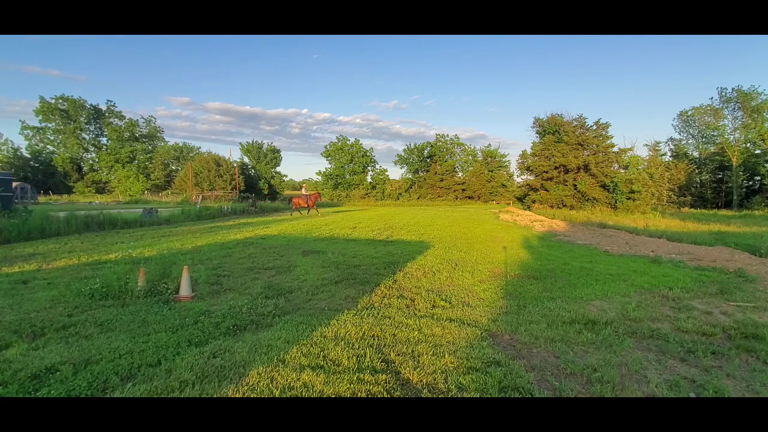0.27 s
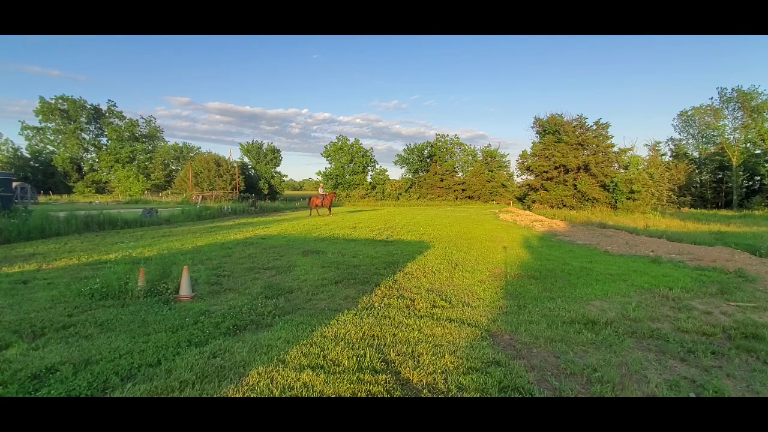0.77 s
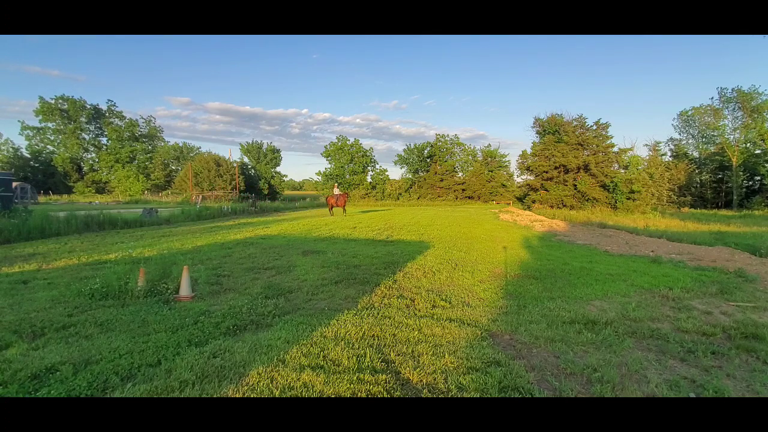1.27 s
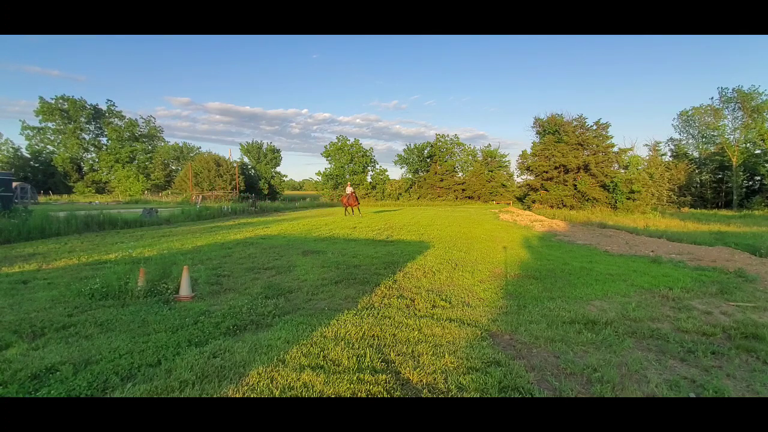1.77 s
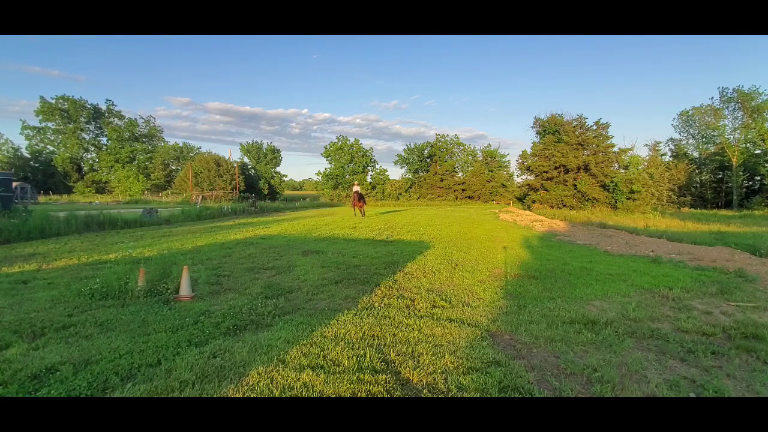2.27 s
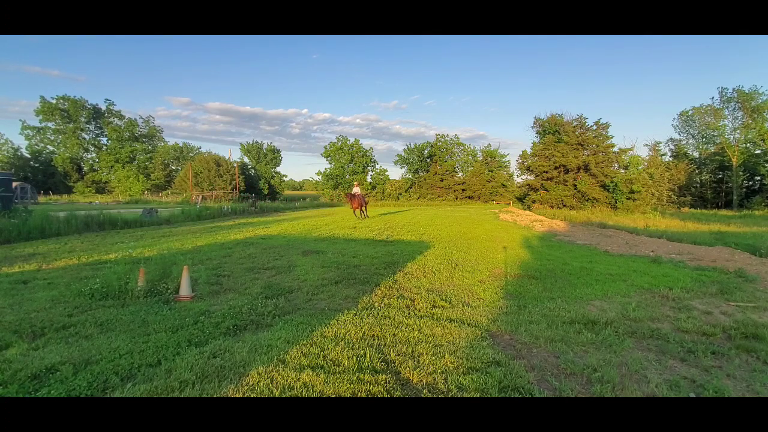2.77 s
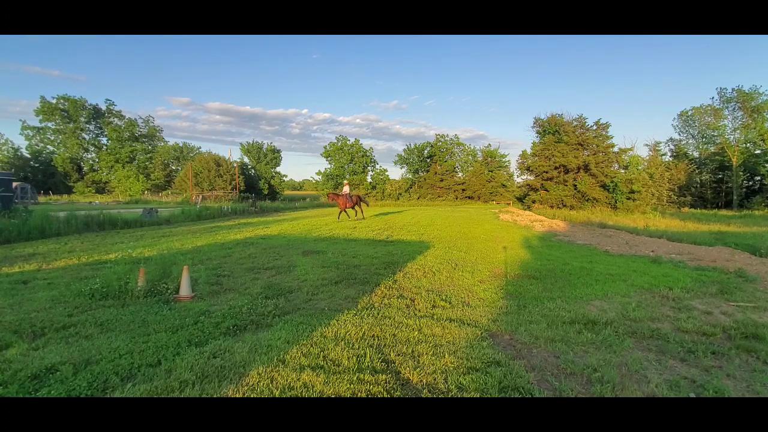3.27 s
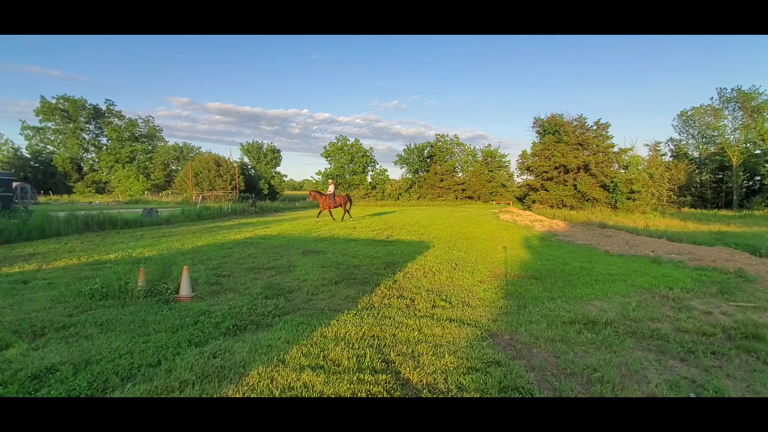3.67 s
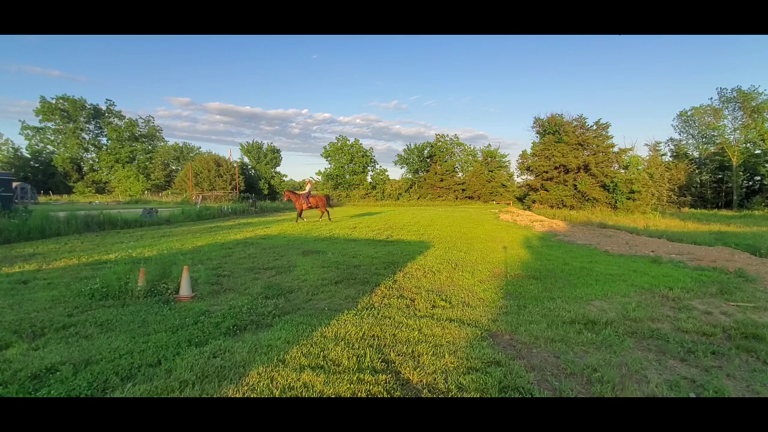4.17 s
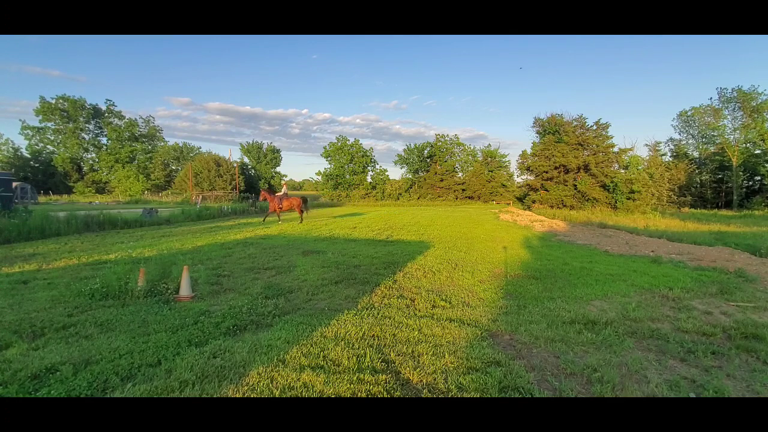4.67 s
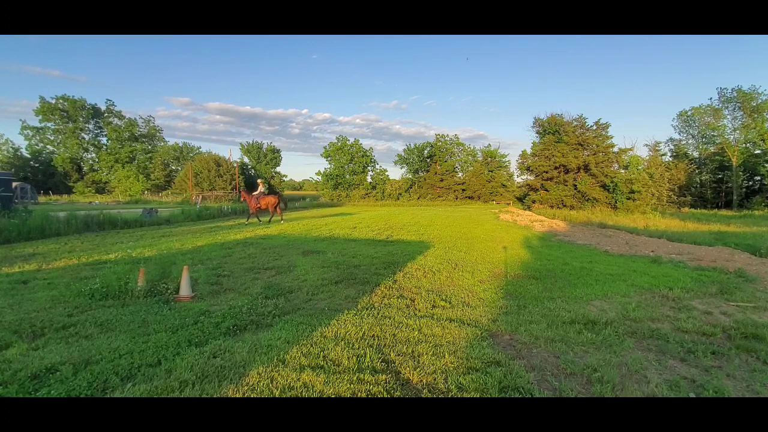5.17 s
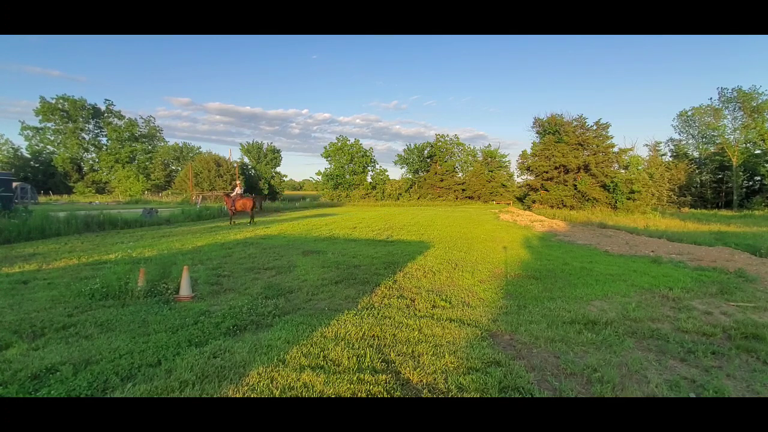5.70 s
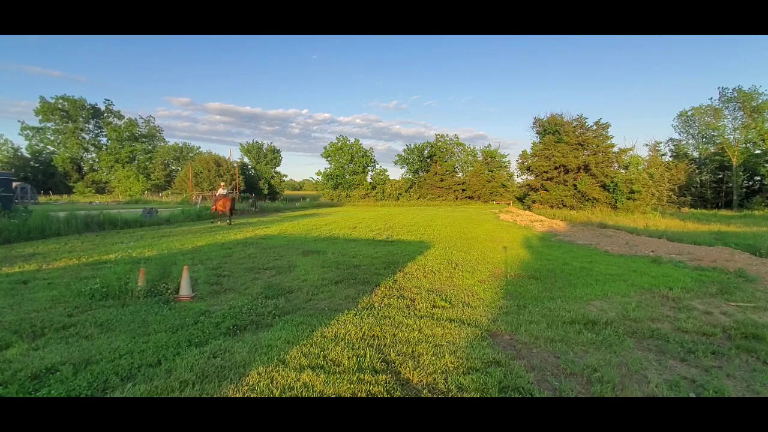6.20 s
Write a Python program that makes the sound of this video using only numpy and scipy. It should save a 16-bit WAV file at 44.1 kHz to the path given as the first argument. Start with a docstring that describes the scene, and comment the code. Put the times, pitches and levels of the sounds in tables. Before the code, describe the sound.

Crickets chirp throughout in an open field, mostly on the left: one close, high and raspy, others pulsing farther off over a steady insect chorus and a faint wash of air. From the start, a songbird on the left whistles one quick, clear phrase, with two falling notes around 1.5 seconds and a short trill ending at about 2.3 seconds. Low wind then builds on the microphone, mainly on the right. Its rumble and thumps are the loudest sound, from about 2.8 to 3.8 seconds. Lighter bumps follow, and a weaker gust reaches both sides from around 5.5 seconds. Faint birds call from distant trees just after the start and again between 3 and 5 seconds. Dry grass brushes and snaps quietly here and there, with soft, dull scuffs near 3.1, 4.6 and 5.8 seconds.

```python
"""Crickets chirp near and far and a songbird whistles one quick phrase, mostly on the left.
It is a summer evening in an open field: wings scrape over a steady insect chorus and a wash of air.
Dry grass brushes and snaps, birds call from the tree line and a few soft scuffs come and go.
Low gusts build and buffet the microphone, their eddies thumping mainly its right port."""
import sys
import numpy as np
from scipy import signal
from scipy.fft import rfft, irfft, next_fast_len
from scipy.io import wavfile
from scipy.ndimage import uniform_filter1d

SR = 44100
rng = np.random.default_rng(int(sys.argv[2]) if len(sys.argv) > 2 else 0)


def master_out(mix):
    """Clip the mix to full scale and print it as 16-bit PCM to the path in sys.argv[1]."""
    frames = np.transpose(np.atleast_2d(mix))
    ceiling = np.clip(frames, -1, 1)
    pcm = np.round(ceiling * 32767).astype(np.int16)
    wavfile.write(sys.argv[1], SR, pcm)


N = 284004
TIME = np.arange(N) / SR

# Tone of the distant air, then of the hiss on the right. Each row: frequency in Hz, relative level in dB.
AIR_COLOUR = [(60, -7), (200, -2.5), (450, 0), (1000, 0), (1450, 4), (2100, -3.5), (3000, -5.5), (5000, 3),
              (8000, -25.5), (15000, -46)]
HISS_COLOUR = [(100, 21), (500, 1.5), (1500, -7), (3500, -9), (6000, -18), (8500, -17), (13000, -10.5),
               (15500, -22)]
# Slow ride of the distant air. Each row: time in seconds, relative level in dB.
AIR_RIDE = [(0.0, -86.5), (0.86, -87.5), (1.15, -84.5), (1.97, -84.5), (2.37, -87), (3.39, -81.5),
            (5.07, -88.5), (5.76, -83.5), (6.06, -86), (6.44, -83)]
# Humming bands of the insect bed. Each row: centre in Hz, width in Hz, level in dB before the swell.
CHORUS_BANDS = [(5316, 676, -64), (4295, 820, -71.5), (6170, 840, -76.5), (3305, 1800, -80.5)]
# Swell of that bed. Each row: time in seconds, gain in dB.
CHORUS_SWELL = [(0, -0.5), (1, -1.5), (2, -1), (3, -2), (3.6, 0.5), (4.4, -3.5), (5.2, -2.5), (5.6, 0),
                (6.44, -2.5)]
# Resting stir of the grass. Each row: time in seconds, relative level in dB.
GRASS_STIR = [(0, -90), (1.15, -88), (1.8, -86.5), (2.45, -89.5), (3.1, -79), (4.1, -95), (4.35, -94),
              (5.3, -91.5), (6.44, -83)]
# Bands where dry blades brush. Each row: centre in Hz, width in Hz, gain in dB.
GRASS_BANDS = [(5400, 4000, -3.5), (9650, 1300, -10.5), (11420, 2040, -5.5), (13600, 1200, -4),
               (14900, 1200, -8.5)]
# Single swishes of grass. Each row: crest in seconds, 60 dB decay in seconds, relative level in dB.
SWISHES = [(.98, 0.72, -78), (1.995, 0.7, -77.5), (2.33, 0.23, -71), (2.72, 0.48, -72), (3.08, 0.3, -69.5),
           (3.17, .3, -73), (3.35, 0.89, -75), (3.59, 0.18, -72), (3.81, 1, -71.5), (4.03, 0.55, -73),
           (4.21, 0.28, -78), (4.6, 0.53, -73), (5.04, 0.5, -78), (5.21, 1.3, -78), (5.58, .3, -76.5),
           (5.73, .6, -75), (5.87, 0.63, -78), (5.99, 0.25, -76), (6.26, 0.24, -70.5)]
# Snapping stalks. Each row: start in seconds, relative level in dB.
SNAPS = [(0.814, -75), (0.9607, -68), (1.9574, -73), (1.993, -59.5), (2.331, -63), (2.683, -72),
         (3.3214, -62.5), (3.584, -66), (3.604, -66), (4.0365, -60.5), (4.36, -77), (4.699, -70),
         (5.189, -66), (5.5805, -63), (5.7073, -65), (5.848, -62.5), (5.8844, -70), (5.988, -70),
         (6.2652, -73)]
# Ring of a stalk. Each row: frequency in Hz, 60 dB decay in seconds, gain in dB.
STALK_MODES = [(6180, 0.012, 7.5), (9600, 0.003, 6.5), (11600, 0.065, 0), (13250, 0.068, 2)]
# Soft scuffs in the field. Each row: start, rise and 60 dB decay in seconds, level in dB.
SCUFFS = [(1.24, 0.1, 0.23, -77), (3.14, 0.047, 0.28, -62.5), (4.598, 0.034, 0.41, -61),
          (5.19, 0.033, 0.41, -74), (5.40, 0.035, 0.69, -70.5), (5.775, 0.036, 0.4, -58.5)]
# Their dull tone. Each row: frequency in Hz, relative level in dB.
SCUFF_COLOUR = [(150, -11), (400, -0.5), (620, -0.5), (850, 2), (1250, -4.5), (1800, -11), (3500, -28)]
# Bouts of the far crickets. Each row: middle of the first and of the last chirp in seconds,
# rough period in seconds, relative level in dB.
FAR_BOUTS = [(.008, 3.255, .203, -63), (3.49, 3.735, .245, -62), (4.04, 4.46, .21, -65),
             (4.67, 4.88, .21, -69), (5.47, 5.89, .21, -63.5), (6.14, 6.37, .23, -70)]
# Calls from the tree line, then the songbird's opening notes. Each row: start and length in seconds,
# first, middle and last pitch in Hz, relative level in dB.
FAR_CALLS = [(.47, 0.059, 1990, 1894, 1850, -68), (.54, 0.025, 3510, 3500, 3600, -60),
             (.84, 0.042, 2890, 3010, 3030, -69), (2.82, 0.15, 4220, 3650, 3140, -65),
             (2.94, 0.22, 2900, 2980, 2910, -67.5), (3.33, .19, 3960, 3605, 3300, -61),
             (3.99, .046, 3030, 3240, 3620, -66), (4.435, 0.047, 2330, 2590, 2980, -63),
             (4.53, 0.33, 2866, 2782, 2840, -70)]
OPENING_NOTES = [(.008, 0.035, 3430, 3740, 3400, -54.5), (.092, 0.11, 3000, 4500, 3300, -49),
                 (.160, 0.036, 2930, 2950, 2540, -59), (.194, 0.025, 3390, 3670, 3050, -47),
                 (.305, 0.069, 3730, 3560, 2870, -55), (.368, 0.062, 4600, 5274, 5150, -52.5),
                 (.385, 0.045, 3280, 3000, 2650, -62), (.423, 0.029, 3260, 3770, 3300, -51),
                 (.425, 0.044, 7250, 5880, 4000, -61), (.600, 0.057, 5200, 4530, 4650, -51.5),
                 (.695, .042, 5200, 6040, 6460, -52.5), (.748, .052, 3230, 3650, 3060, -58.5),
                 (.976, 0.027, 4670, 5740, 7200, -53.5), (.997, 0.026, 7000, 5320, 4750, -45.5),
                 (1.012, 0.1, 5140, 4264, 3860, -44.5), (1.095, .034, 3640, 3460, 2780, -60),
                 (1.160, 0.068, 2580, 3700, 3370, -56)]
# A falling slur with a hook, then a trill syllable: up-flick, down-flick, low whistle.
# Rows read like the notes above, with start and level counted from each cue.
SLUR = [(0, .075, 6530, 6440, 5730, -8), (.046, 0.028, 6460, 5340, 4740, -1.5),
        (.06, 0.037, 6400, 5250, 4440, -8), (.07, .015, 4700, 4100, 3330, -4.5),
        (.092, .045, 3140, 4210, 4140, -.5)]
SYLLABLE = [(0, .013, 4210, 5250, 7000, 3), (.019, .011, 6500, 5060, 3900, 4),
            (.034, .085, 3500, 3230, 3135, -8.5)]
# Cues for the two slurs, then for the closing trill. Each row: start in seconds, level in dB.
SLUR_CUES = [(1.338, -45), (1.565, -48.5)]
TRILL_CUES = [(1.787, -56), (1.936, -57.5), (2.082, -57), (2.226, -59.5)]
# Bouts of the near cricket. Each row: last stroke of the first and of the last chirp in seconds,
# rough period in seconds, relative level in dB.
NEAR_BOUTS = [(.117, .44, .32, -55.5), (1.314, 1.851, .18, -56), (2.27, 3.75, .25, -54.5),
              (4.2, 6.0, .22, -55)]
# Longer, softer rasps of a second cricket close by. Each row: last stroke and crescendo span in seconds,
# relative level in dB.
RASPS = [(0.175, .06, -60), (1.077, 0.15, -63), (2.174, 0.12, -63.5), (2.323, .13, -59.5),
         (3.57, 0.22, -57.5), (4.007, 0.51, -62), (4.512, 0.056, -56.5), (4.975, 0.079, -58.5),
         (6.25, .12, -58.5)]
# Gusts on the right port, a long rise and a weaker one, then on the sheltered left port.
# Each row: time in seconds, relative level in dB.
RIGHT_GUSTS = [(0, -59), (.4, -61), (.68, -64.5), (1.05, -58.5), (1.25, -66), (1.75, -49.5), (2.15, -54.5),
               (2.33, -43), (2.46, -53), (2.6, -41), (2.82, -46), (2.96, -27.5), (3.17, -40), (3.25, -55),
               (3.31, -32), (3.52, -39.5), (3.73, -37), (3.8, -51.5), (4.6, -59.5), (5.17, -66),
               (5.36, -59.5), (5.48, -42.5), (6.0, -50), (6.44, -50.5)]
LEFT_GUSTS = [(0, -95), (2.3, -92), (3.1, -77), (3.65, -60), (4.35, -82), (4.92, -64), (5.1, -75),
              (5.53, -68), (5.59, -38.5), (5.77, -69), (5.87, -49), (6.1, -69), (6.44, -57)]
# Tone of the wind rumble. Each row: frequency in Hz, relative level in dB.
WIND_COLOUR = [(15, -33), (30, -14), (48, 3), (62, 0.5), (78, -1), (98, -9.5), (135, -20.5), (180, -28),
               (260, -39.5), (450, -54), (700, -94), (3000, -120)]
# Eddies that slap the microphone. Each row: start in seconds, relative peak in dB, port.
EDDIES = [(.395, -43.5, "right"), (1.348, -41, "right"), (2.367, -27.5, "right"), (2.478, -54, "left"),
          (2.76, -39, "right"), (2.851, -19, "right"), (2.91, -15, "right"), (2.944, -34, "right"),
          (2.987, -12, "right"), (3.123, -18.5, "right"), (3.178, -20, "right"), (3.345, -27, "right"),
          (3.389, -44, "left"), (3.43, -18.5, "right"), (3.476, -16.5, "right"), (3.522, -11.5, "right"),
          (3.565, -36, "left"), (3.72, -15, "right"), (3.898, -31.5, "right"), (4.024, -33.5, "right"),
          (4.199, -31, "right"), (4.648, -33.5, "right"), (4.8, -42, "right"), (4.907, -32.5, "right"),
          (4.958, -59, "left"), (5.447, -42, "right"), (5.56, -27.5, "right"), (5.644, -41, "left")]


def from_db(db):
    """Decibels to gain."""
    return 10 ** (np.asarray(db) / 20)


def rms_one(x):
    """Scale to rms 1."""
    return x / np.sqrt(np.mean(x ** 2) + 1e-20)


def ride(rows):
    """A fader ride through (seconds, dB) points, at every sample."""
    return np.interp(TIME, *np.transpose(rows))


def add(track, start, sound):
    """Mix a sound in at a time in seconds."""
    at = int(start * SR)
    first, last = max(at, 0), min(at + len(sound), N)
    if last > first:
        track[first:last] += sound[first - at:last - at]


def drift(rate_hz):
    """Smooth random modulation of rms 1."""
    pole = np.exp(-80 * np.pi * rate_hz / SR)
    noise = rng.standard_normal(N // 40 + 2002)   # one value per 40 samples
    slow = signal.lfilter([1], [1, -2 * pole, pole * pole], noise)[2000:]
    return np.interp(np.arange(N) / 40, np.arange(len(slow)), rms_one(slow))


def coloured(points):
    """Noise shaped by a smooth EQ curve, at rms 1."""
    size = next_fast_len(N)
    hz, level_db = np.transpose(points)
    bins = np.maximum(np.arange(size // 2 + 1) * SR / size, 1)
    eq = from_db(np.interp(np.log(bins), np.log(hz), level_db))
    return rms_one(irfft(rfft(rng.standard_normal(N), size) * eq, size)[:N])


def band(x, low_hz, high_hz, order=2):
    """Band-pass filter."""
    return signal.sosfilt(signal.butter(order, [low_hz, high_hz], "band", fs=SR, output="sos"), x)


def scatter(x, t60):
    """Diffuse echoes from grass and trees, of unit energy."""
    tail = rng.standard_normal(SR) * from_db(-60 * TIME[:SR] / t60)
    return signal.fftconvolve(x, tail / np.linalg.norm(tail))[:N]


def pan_left(x, bleed_db):
    """A source on the left bleeds faintly into the right, partly scattered."""
    return np.array([x, from_db(bleed_db) * (0.42 * x + 1.1 * scatter(x, t60=0.05))])


def beats(bouts, spread_db):
    """Time and level of evenly spaced chirps, each a little louder or softer."""
    return [(s, db + spread_db * rng.standard_normal()) for first, last, period, db in bouts
            for s in np.linspace(first, last, round((last - first) / period) + 1)]


def repeated(motif, cues):
    """The notes of a motif, sung at each cue."""
    return [(s + lag, *shape, db + gain_db) for s, db in cues for lag, *shape, gain_db in motif]


def air(waver_db=1.62):
    """The far wash of the landscape on the left; on the right, a hiss that grows with the wind."""
    wash = coloured(AIR_COLOUR) * from_db(ride(AIR_RIDE) + 12 + waver_db * drift(3.3))
    gust_lift = np.hypot(1, from_db(0.22 * (ride(RIGHT_GUSTS) + 50)))
    hiss = coloured(HISS_COLOUR) * from_db(-72) * gust_lift
    return np.array([wash, hiss])


def chorus():
    """Countless far insects merge into a bed of shimmering bands."""
    swell_db = ride(CHORUS_SWELL)
    bed = 0
    for hz, width, level_db in CHORUS_BANDS:
        voices = rms_one(band(rng.standard_normal(N), hz - width / 2, hz + width / 2, order=3))
        bed += voices * from_db(level_db + swell_db + drift(34))
    return bed


def grass(grains_per_s=2500, size_db=1.5, flicker_db=3.5, rise_db_per_s=159):
    """Blades brush in dense tiny clicks; swishes swell fast and die away over the resting stir."""
    power = from_db(ride(GRASS_STIR)) ** 2
    for crest, t60, db in SWISHES:
        below_db = np.maximum(rise_db_per_s * (crest - TIME), 60 * (TIME - crest) / t60)
        power += from_db(db - np.minimum(below_db, 60)) ** 2
    level_db = 10 * np.log10(power) + 7.5
    brush = 0
    for hz, width, db in GRASS_BANDS:
        sizes = rng.choice([-1, 1], N) * from_db(size_db * np.minimum(rng.exponential(1, N), 5))
        clicks = sizes * (rng.random(N) < grains_per_s / SR)
        grains = rms_one(band(clicks + 1e-18, hz - width / 2, hz + width / 2))
        brush += grains * from_db(level_db + db + flicker_db * drift(25))
    return brush


def stalks(crack_t60=0.004, detune=0.039):
    """A stalk snaps with a bright crack and rings briefly."""
    snaps, t = np.zeros(N), TIME[:SR // 20]
    for start, level_db in SNAPS:
        crack = band(rng.standard_normal(len(t)), 5100, 13000) * from_db(-60 * t / crack_t60)
        ring = sum(from_db(db - 60 * t / t60) * np.sin(2 * np.pi * hz * rng.normal(1, detune) * t)
                   for hz, t60, db in STALK_MODES)
        add(snaps, start, from_db(level_db + 1.5) * (crack + 1.23 * ring))
    return snaps


def scuffs(grain_db=1.5):
    """Short, dull rushes of noise with a trailing tail."""
    swell = 0
    for start, rise, t60, db in SCUFFS:
        attack = np.clip((TIME - start) / rise, 0, 1)
        swell += attack * from_db(db - 60 * np.maximum(TIME - start - rise, 0) / t60)
    return swell * from_db(grain_db * drift(50)) * coloured(SCUFF_COLOUR)


def far_crickets(tooth_hz=4100, stroke_hz=77, count=3):
    """A few crickets chirp in step, about five times a second, smeared by distance."""
    swell = sum(from_db(db) * np.exp(-((TIME - s) / .041) ** 2)
                for s, db in beats(FAR_BOUTS, spread_db=1))
    tone = 0
    for _ in range(count):
        hz = tooth_hz * (1 + .023 * drift(90))
        stroke = np.sin(np.pi * (stroke_hz * TIME + rng.random()))   # each stroke swells and dies
        tone += stroke * np.sin(2 * np.pi * np.cumsum(hz) / SR)
    chirps = from_db(1) * swell * tone
    return chirps + from_db(-7) * scatter(chirps, t60=.25)


def whistles(notes, taper, waver, flutter_db):
    """A bird's voice: each note is a near sine that bends through three pitches."""
    voice = np.zeros(N)
    wobble, flutter = 1 + waver * drift(120), from_db(flutter_db * drift(130))
    for start, length, first, middle, last, level_db in notes:
        progress = np.linspace(0, 1, int(length * SR))
        here = slice(int(start * SR), int(start * SR) + len(progress))
        bend = np.polyfit([0, .5, 1], [first, middle, last], 2)
        hz = np.polyval(bend, progress) * wobble[here]
        swell = np.abs(np.sin(np.pi * progress)) ** taper * flutter[here]
        add(voice, start, from_db(level_db) * swell * np.sin(2 * np.pi * np.cumsum(hz) / SR))
    return voice


def far_birds():
    """Blurred calls from the tree line, more echo than direct sound."""
    calls = whistles(FAR_CALLS, taper=.8, waver=.022, flutter_db=3)
    return from_db(-8) * calls + from_db(-4) * scatter(calls, t60=.45)


def songbird():
    """One clear phrase ending in a trill, echoing off the ground and the trees."""
    notes = OPENING_NOTES + repeated(SLUR, SLUR_CUES) + repeated(SYLLABLE, TRILL_CUES)
    song = whistles(notes, taper=1.15, waver=.007, flutter_db=2)
    ground = from_db(-9.5) * scatter(song, t60=.06)
    trees = from_db(-11.5) * scatter(song, t60=.6)
    return song + ground + trees


def near_cricket(tooth_hz=6860, fall=0.18, chirp_s=0.049, stroke_s=0.0076, last_period_s=.0098,
                 slowing=0.031, crescendo_db=10, max_strokes=16):
    """Each wing stroke is a raspy falling tone with its octave; a chirp grows louder and slower."""
    strokes, progress = np.zeros(N), np.linspace(0, 1, int(stroke_s * SR))
    chirps = [(s, chirp_s, db) for s, db in beats(NEAR_BOUTS, spread_db=1.7)]
    for end, span, level_db in chirps + RASPS:
        lead_s = 0   # strokes are laid backwards from the last one
        for k, (pitch, force, *teeth) in enumerate(rng.standard_normal((max_strokes, 14))):
            if lead_s > span:
                break
            # the scraper skips over the file
            skips = np.interp(progress, np.linspace(0, 1, len(teeth)), teeth)
            hz = tooth_hz * (1 + fall * (.5 - progress) + .02 * pitch + .016 * skips)
            phase = 2 * np.pi * np.cumsum(hz) / SR
            tone = np.sin(phase) + from_db(-2.5) * np.sin(2 * phase)
            gain = from_db(level_db - crescendo_db * lead_s / span + 0.64 * force)
            add(strokes, end - lead_s - stroke_s / 2, gain * np.sin(np.pi * progress) ** 2 * tone)
            lead_s += last_period_s / (1 + slowing * k)
    return strokes + from_db(-12) * scatter(strokes, t60=.1)


def turbulence(level_db, lumpy_db, fine_hz, fine_db, growth=1.246):
    """Lumpy pressure rumble at one port; finer eddies grow faster than the gust."""
    flow = coloured(WIND_COLOUR)
    flow /= np.sqrt(uniform_filter1d(flow ** 2, size=2500) + 1e-4)   # levelled, so the gust shapes it
    gust_db = level_db + lumpy_db * drift(11.7)
    fine = rms_one(band(rng.standard_normal(N), 0.88 * fine_hz, 1.17 * fine_hz))
    return flow * from_db(gust_db) + fine * from_db(growth * gust_db + fine_db)


def wind(thump_hz=(58, 104), edge_hz=(160, 238), edge_db=-15, eddy_s=0.0015):
    """Each port has its own turbulence; sharp eddies slap it with a thump and a brighter edge."""
    ports = {"left": turbulence(ride(LEFT_GUSTS) + 1, lumpy_db=1.5, fine_hz=267, fine_db=-8.5),
             "right": turbulence(ride(RIGHT_GUSTS) + 3.5, lumpy_db=3, fine_hz=183.5, fine_db=-20)}
    t = TIME[:SR // 5]
    push = t * np.exp(-t / eddy_s)
    slap = band(push, *thump_hz) + from_db(edge_db) * band(push, *edge_hz)
    for start, peak_db, port in EDDIES:
        add(ports[port], start, from_db(peak_db - 4.5) * slap / np.abs(slap).max())
    return np.array([ports["left"], ports["right"]])


def scene():
    """The stereo mix: the life of the field on the left, the wind mainly on the right."""
    insects = pan_left(near_cricket() + far_crickets() + chorus(), bleed_db=-34.5)
    birds = pan_left(songbird() + far_birds(), bleed_db=-29.5)
    rustle = pan_left(grass() + stalks(), bleed_db=-33)
    return insects + birds + rustle + pan_left(scuffs(), bleed_db=-15) + air() + wind()


def record(dry, low_cut_hz=38, high_cut_hz=15750):
    """A low cut takes out the deepest rumble; the top is cut steeply."""
    trimmed = signal.sosfilt(signal.butter(4, low_cut_hz, "high", fs=SR, output="sos"), dry)
    return signal.sosfilt(signal.ellip(10, .1, 70, high_cut_hz, fs=SR, output="sos"), trimmed)


dry = scene()
out = record(dry)
master_out(out)
```